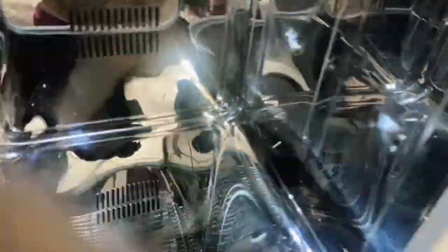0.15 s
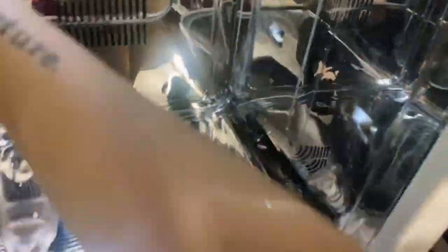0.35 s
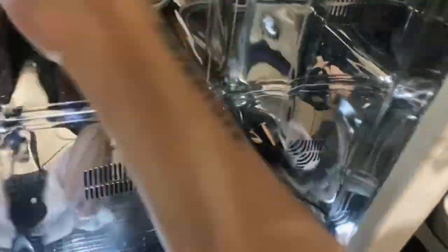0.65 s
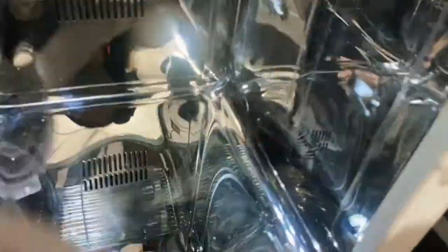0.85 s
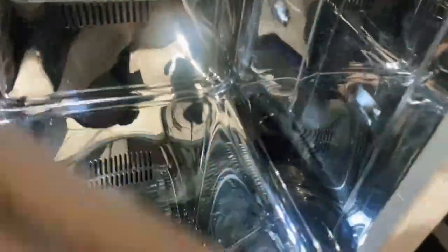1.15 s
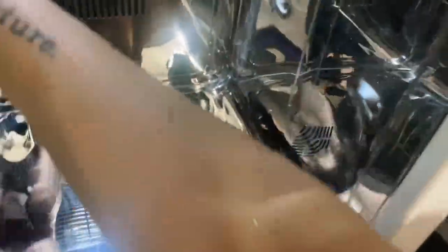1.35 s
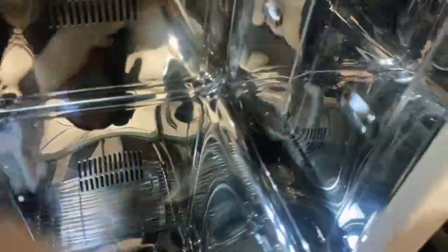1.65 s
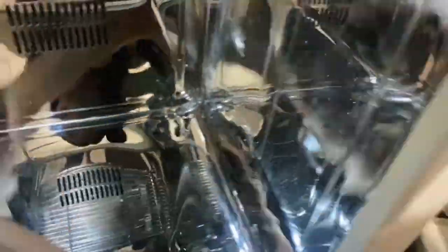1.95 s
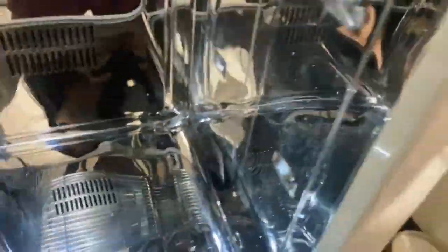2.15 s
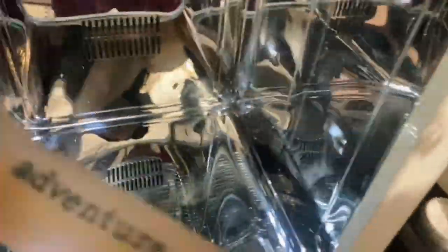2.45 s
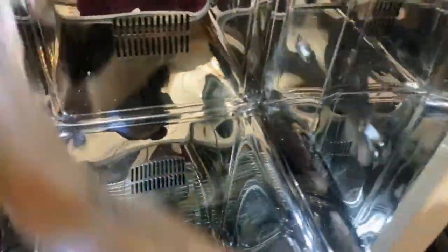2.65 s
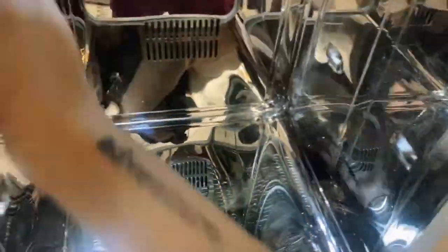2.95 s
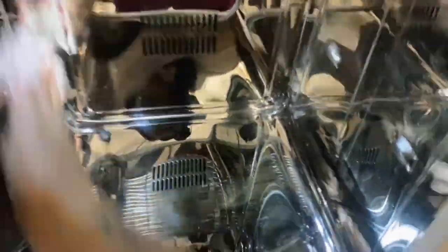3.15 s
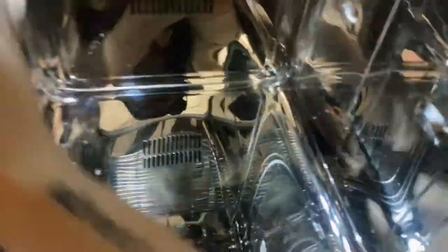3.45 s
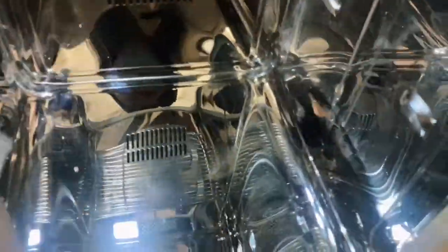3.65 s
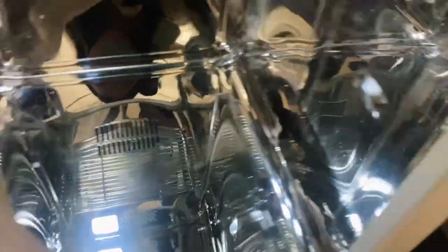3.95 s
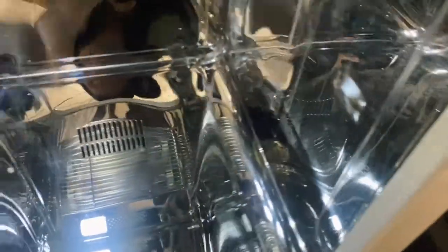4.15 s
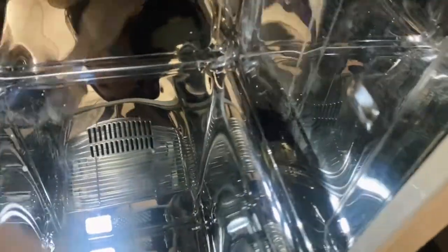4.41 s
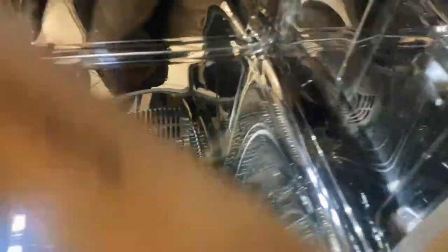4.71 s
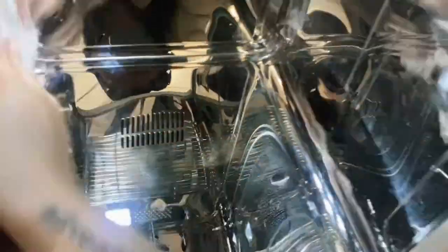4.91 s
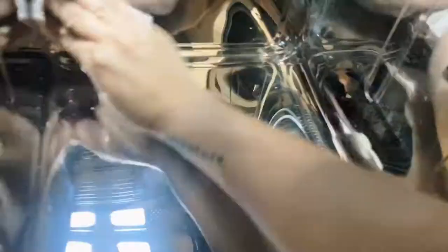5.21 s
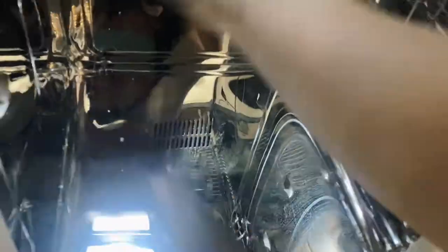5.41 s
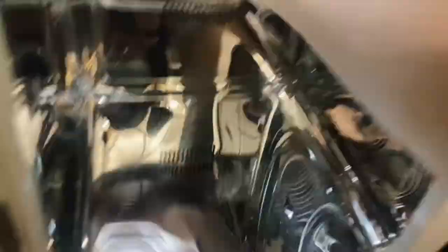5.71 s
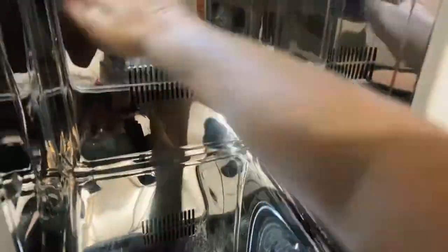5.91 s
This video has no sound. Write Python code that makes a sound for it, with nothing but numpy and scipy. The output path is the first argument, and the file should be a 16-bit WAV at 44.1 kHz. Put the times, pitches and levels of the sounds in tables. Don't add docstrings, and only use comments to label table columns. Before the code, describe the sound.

Inside a small metal cabinet, with the microphone very close, a dry cloth rubs in short uneven strokes. From 0 to 1.9 s the rubbing is busiest: low grainy scuffs, soft fibre hiss, dull plucks of sheet metal and bright little ticks, with sharper taps near 0.35, 0.75 and 1.8 s. From 2 to 4 s the rubbing thins and deeper, rounded panel thumps stand out, strongest near 2.0, 2.6 and 3.45 s. At 4.05 s a hard, short knock cracks and overloads the microphone, followed by a low door wobble fading over half a second. Light sweeps and thumps continue. At 5.15 s a softer, low ringing knock comes, then at 5.25 s a clattering rebound with loose rattle and scrape. A few scuffs and taps fade into quiet room noise by 6 s. Short, boxy metallic echo throughout.

```python
import sys
import numpy as np
from scipy import signal
from scipy.fft import rfft, irfft, next_fast_len
from scipy.io import wavfile
from scipy.ndimage import uniform_filter1d

SR = 44100
rng = np.random.default_rng(int(sys.argv[2]) if len(sys.argv) > 2 else 0)


def undo_db(level):
    steps = np.asarray(level, float) / 20
    return 10 ** steps


def file_out(sig):
    cols = np.atleast_2d(sig).T
    lim = np.clip(cols, -1, 1)
    pcm = np.round(lim * 32767).astype(np.int16)
    wavfile.write(sys.argv[1], SR, pcm)


N = 267755


def evened(x):
    return x / np.sqrt(np.mean(x ** 2) + 1e-20)


def read(points, hz):
    f, value = np.transpose(points)
    return np.interp(np.log(hz + 1), np.log(f + 1), value)


def curve(rows):
    s, value = np.transpose(rows)
    return np.interp(np.arange(N) / SR, s, value)


def add(mix, s, sound):
    part = mix[round(s * SR):][:len(sound)]
    part += sound[:len(part)]


def coloured(x, points):
    size = next_fast_len(len(x))
    gain = undo_db(read(points, np.fft.rfftfreq(size, 1 / SR)))
    return evened(irfft(rfft(x, size) * gain, size)[:len(x)])


def band(x, lo_hz, hi_hz):
    return signal.sosfilt(signal.butter(2, [lo_hz, hi_hz], "bandpass", fs=SR, output="sos"), x)


def lumps(width_s):
    size = round(width_s * SR)
    return evened(uniform_filter1d(uniform_filter1d(rng.standard_normal(N), size), size))


def struck(hz, db, t60, rise):
    t = np.arange(SR // 2) / SR
    return undo_db(db - 60 * t / t60) * (1 - np.exp(-t / rise)) * np.sin(2 * np.pi * hz * t)


# f/Hz, width/Hz, level/dB
SHELL = [(180, 33, -14), (307, 81, -7), (480, 55, -13.5), (770, 22, -5), (976, 12, -4), (1365, 73, -10),
         (2020, 250, -6.5), (2890, 84, -6.5), (3870, 270, -15.5)]


def shell(x):
    out = x.copy()
    for hz, width_hz, db in SHELL:
        out += undo_db(db + 8) * signal.lfilter(*signal.iirpeak(hz, hz / width_hz, SR), x)
    return out


# t/s, level/dB
PRESSURE = [(0.0, -37.5), (0.14, -49), (0.36, -45.5), (0.69, -49), (0.9, -44), (1.5, -47.5), (1.85, -51),
            (1.99, -54.5), (2.38, -57.5), (2.94, -59), (3.22, -49), (3.62, -54.5), (4.03, -56), (4.95, -52),
            (5.2, -78), (5.32, -42), (5.58, -51), (6.07, -65.5)]
# f/Hz, level/dB
RUB_COLOUR = [(29, -30), (60, -1), (182, 1.5), (467, -12), (567, -16), (742, -19.5), (1180, -37.5),
              (1370, -23.5), (1700, -47.5), (3820, -44.5), (5000, -83), (6500, -60), (11000, -120)]


def rub():
    grabs, t = np.zeros(N), np.arange(SR // 5) / SR
    for s, db, _ in TAPS:
        add(grabs, s, undo_db(0.24 * (db + 36)) * np.exp(-t / 0.045))
    for s, db, _ in FLOOR_THUMPS + SIDE_THUMPS:
        add(grabs, s, 0.83 * undo_db(0.56 * (db + 27)) * np.exp(-t / 0.05))
    for s, db, _ in SNAPS:
        add(grabs, s, 0.5 * undo_db(0.4 * (db + 32)) * np.exp(-t / 0.022))
    sizes = undo_db(3.7 * np.minimum(rng.exponential(1, N), 3.6))
    happens = rng.random(N) < 1500 / SR
    slips = sizes * happens * rng.choice([-1., 1.], N)
    slips = evened(slips * undo_db(1.97 * lumps(0.02) + 6.8 * np.minimum(grabs, 1.9)))
    return undo_db(curve(PRESSURE) + 5.5) * coloured(shell(slips), RUB_COLOUR)


# t/s, hiss gained level/dB
STROKES = [(0.18, 0), (0.5, 5), (1.14, 8), (2.37, 9), (2.6, 5), (2.7, 4), (2.85, 7), (3.22, 9), (3.63, 6.5),
           (4.21, 2), (4.33, 7), (5.9, 4)]
# f/Hz, level/dB
HISS_COLOUR = [(1200, -26), (2200, 0), (4200, -13.5), (5200, -13), (7500, -12.5), (10500, -10),
               (13500, -35), (15700, -23)]
HISS_DB, HISS_FOLLOWS = -80, 0.092
USUAL_PRESSURE_DB, STROKE_S = -52, 0.04


def hiss():
    hiss_db = HISS_DB + HISS_FOLLOWS * (curve(PRESSURE) - USUAL_PRESSURE_DB)
    t = np.arange(N) / SR
    for s, db in STROKES:
        hiss_db += db * np.exp(-((t - s) / STROKE_S) ** 2)
    fibres = rng.standard_normal(N) * undo_db(3.2 * lumps(0.0061) + 1.8 * lumps(0.00068))
    return undo_db(hiss_db + 2.5) * coloured(fibres, HISS_COLOUR)


# t/s, peak level/dB, f/Hz
SNAPS = [(0.055, -34, 310), (0.244, -37, 304), (0.299, -41, 237), (0.351, -27, 420), (0.406, -32, 237),
         (0.429, -30, 272), (0.492, -39, 258), (0.633, -35, 250), (0.687, -38, 320), (0.759, -28, 374),
         (0.794, -32, 288), (0.853, -29, 293), (0.894, -34, 272), (0.934, -33, 242), (0.974, -35, 256),
         (1.017, -32, 318), (1.058, -34, 269), (1.111, -32, 277), (1.149, -32, 299), (1.191, -36, 237),
         (1.244, -39, 283), (1.316, -33, 323), (1.384, -35, 328), (1.417, -33, 328), (1.473, -32, 248),
         (1.509, -42, 277), (1.591, -37, 264), (1.621, -32, 283), (1.771, -28, 237), (1.792, -22, 455),
         (1.811, -32, 452), (1.871, -34, 404), (1.974, -40, 237), (2.023, -38, 237), (2.141, -40, 293),
         (2.573, -37, 237), (2.694, -38, 248), (2.81, -40, 237), (2.974, -34, 320), (3.179, -36, 248),
         (3.226, -34, 299), (3.323, -36, 253), (3.367, -33, 299), (3.454, -37, 237), (3.612, -38, 385),
         (3.796, -36, 237), (3.902, -37, 237), (4.105, -29, 237), (4.641, -41, 237), (5.309, -33, 509),
         (5.359, -28, 256), (5.418, -32, 256), (5.449, -37, 253), (5.486, -36, 253), (5.531, -30, 272),
         (5.836, -40, 261), (5.888, -38, 237)]
# t/s, peak level/dB, f/Hz
PICKS = [(0.302, -43, 643), (0.35, -38, 550), (0.634, -46, 595), (0.756, -31.5, 552), (0.895, -42, 821),
         (0.921, -37, 770), (1.018, -40, 552), (1.06, -44, 606), (1.111, -44, 587), (1.279, -37, 767),
         (1.473, -41, 705), (1.591, -45, 568), (1.624, -42, 608), (1.771, -37.5, 678), (1.792, -32, 552),
         (1.88, -45, 598), (2.136, -47, 552), (2.567, -46, 552), (2.81, -43, 554), (3.09, -44, 608),
         (3.181, -41, 603), (3.251, -43, 654), (3.323, -50, 678), (3.365, -43, 550), (3.611, -45, 770),
         (3.801, -32, 770), (4.129, -39, 861), (4.198, -46, 552), (4.297, -50, 555), (4.344, -49, 611),
         (4.497, -46, 552), (5.36, -39, 643), (5.418, -40, 627), (5.447, -46, 552), (5.487, -47, 579),
         (5.533, -38, 649), (5.895, -43, 606)]
SNAP_T60_S, SNAP_RISE_S, PICK_T60_S, PICK_RISE_S = 0.034, 0.0011, 0.03, 0.00047


def snaps():
    out = np.zeros(N)
    for s, db, hz in SNAPS:
        add(out, s - .001, struck(hz, db - 3.5, SNAP_T60_S, SNAP_RISE_S)[:SR // 8])
    for s, db, hz in PICKS:
        pick = struck(hz, db + 0.6, PICK_T60_S, PICK_RISE_S)
        pick += struck(1387, db - 12, 0.03, PICK_RISE_S)
        add(out, s - .0005, pick[:SR // 8])
    return out


TICK_TRIM_DB = (0, 1.5, -1)
GRIT_DB = -4


def scuff(db, body_db, treble_db, rise, t60):
    t = np.arange(round(.25 * SR)) / SR
    fade = undo_db(-60 * t / t60) + 0.28 * undo_db(-60 * t / 0.0026)
    burst = rng.standard_normal(len(t)) * fade * (1 - np.exp(-t / rise))
    middle, body, treble = undo_db(np.add((db, db + body_db, treble_db), TICK_TRIM_DB))
    out = middle * band(burst, 835, 3760)
    out += body * band(burst, 480, 1417)
    out += undo_db(GRIT_DB) * body * band(burst, 250, 600)
    return out + treble * band(burst, 2500, 11600)


# t/s, peak level/dB, sharpness (treble against peak) level/dB, t60/s
TICKS = [(0.199, -58, 0.5, 0.07), (0.2563, -48, -7.5, 0.044), (0.3015, -52.5, -18, 0.14),
         (0.3503, -38, -18, 0.063), (0.42, -50, -8, 0.14), (0.4562, -49, -14, 0.1), (0.634, -53, -8, 0.28),
         (0.7565, -43.5, -10.5, 0.12), (0.7939, -53, -27, 0.1), (0.8954, -47.5, -9, 0.17),
         (0.9172, -35, -12, 0.12), (1.0173, -47, -10.5, 0.078), (1.11, -56, -12, 0.35),
         (1.2772, -44.5, -13.5, 0.22), (1.4725, -56, -21, 0.12), (1.6286, -49, -13, 0.13),
         (1.7912, -29.5, -14.5, 0.083), (2.149, -51.5, -13, 0.14), (2.5678, -64, -7, 0.17),
         (3.18, -43, -15, 0.075), (3.23, -50, -12, 0.097), (3.6106, -55.5, -9, 0.16),
         (3.8006, -42.5, -16.5, 0.1), (4.13, -45, -14.5, 0.13), (4.196, -51.5, -7, 0.082),
         (4.2992, -51, -7, 0.058), (4.4998, -47.5, -8.5, 0.045), (5.4174, -53, -26, 0.13),
         (5.5342, -47, -13, 0.12), (5.8364, -52, -13, 0.17)]
# t/s, peak level/dB
FAINT_TICKS = [(0.8694, -56), (1.0625, -56), (1.4183, -52), (1.8802, -55), (2.0214, -50), (3.2803, -56),
               (3.3234, -71), (3.3655, -66), (4.929, -58), (4.965, -56), (5.4864, -57), (5.509, -50)]
FAINT_SHARP_DB, FAINT_T60_S, TICK_RISE_S = -12.5, 0.083, 0.0012
BODY_DB, BODY_PER_DULL_DB, BODY_PER_SOFT_DB = 14, 0.27, 0.47


def ticks():
    out = np.zeros(N)
    faint = [(s, db, FAINT_SHARP_DB, FAINT_T60_S) for s, db in FAINT_TICKS]
    for s, db, sharp_db, t60 in TICKS + faint:
        body_db = BODY_DB - BODY_PER_DULL_DB * (sharp_db + 18.5) - BODY_PER_SOFT_DB * (db + 55)
        add(out, s - .001, scuff(db, body_db, db + sharp_db, TICK_RISE_S, t60))
    return out


# t/s, treble level/dB
SWISHES = [(1.865, -59), (2.105, -57), (4.455, -55), (4.659, -57), (4.9, -55.5)]
SWISH_DB, SWISH_RISE_S, SWISH_T60_S = -63, 0.028, 0.24


def swishes():
    out = np.zeros(N)
    for s, treble_db in SWISHES:
        add(out, s - .001, scuff(SWISH_DB, 0, treble_db, SWISH_RISE_S, SWISH_T60_S))
    return out


# t/s, level/dB
LEAN = [(0.0, -27), (1.25, -30), (1.76, -29.5), (2.18, -29), (2.28, -28.5), (3.11, -28), (3.58, -28.5),
        (3.79, -31.5), (4.19, -31), (4.58, -30), (4.89, -31), (5.51, -27), (5.75, -24), (6.07, -32.5)]
# f/Hz, level/dB
FLEX_COLOUR = [(1, -20), (3, 0), (17, 0), (21, -4), (26, -14), (33, -18), (42, -18), (60, -29), (80, -39),
               (120, -60), (250, -130)]
FLEX_UNEVEN_DB, FLEX_SURGE_S = 2, 0.24


def flexing():
    level_db = curve(LEAN) + 4 + FLEX_UNEVEN_DB * lumps(FLEX_SURGE_S)
    return undo_db(level_db) * coloured(rng.standard_normal(N), FLEX_COLOUR)


# t/s, peak level/dB, f/Hz
FLOOR_THUMPS = [(0.629, -35.5, 102.5), (0.851, -27.5, 132), (1.128, -50, 128), (1.393, -30, 128),
                (1.671, -33, 136), (1.975, -26, 134.4), (2.022, -14.5, 145), (2.15, -32, 158),
                (2.44, -36.5, 139), (2.475, -32.5, 144.6), (2.704, -21.5, 132), (2.749, -28.5, 139),
                (3.033, -26, 153), (3.191, -21, 156.4), (3.234, -23.5, 139), (3.327, -26, 170),
                (3.461, -12, 140), (3.49, -19, 133.7), (3.607, -27, 122.2), (3.905, -17, 134),
                (4.373, -44, 123), (4.51, -24, 123), (4.548, -36, 141.4), (4.67, -35, 127.4),
                (5.354, -40, 119), (5.409, -29, 105), (5.524, -22.5, 101), (5.562, -46, 126)]
# t/s, peak level/dB, f/Hz
SIDE_THUMPS = [(0.059, -28.5, 176), (0.243, -28.5, 198.4), (0.409, -19.5, 170.5), (0.429, -33, 264.6),
               (0.758, -28.5, 180), (0.966, -27.5, 178), (1.053, -60, 272), (1.112, -28, 196),
               (1.15, -52, 295), (1.369, -25, 180), (1.557, -40, 195), (1.616, -32, 196), (1.787, -22, 182),
               (1.866, -27.5, 172), (2.568, -17, 167.5), (2.68, -24, 179), (2.812, -20.5, 181),
               (2.93, -30.5, 161), (2.981, -18.5, 158), (3.08, -28.5, 169), (3.357, -24, 175),
               (3.798, -23.5, 182), (4.634, -23, 168), (4.868, -37.5, 182)]
THUMP_T60_S, THUMP_LONGER_PER_DB = 0.12, 0.0757


def thumps():
    out = np.zeros(N)
    for s, db, hz in FLOOR_THUMPS + SIDE_THUMPS:
        t60 = THUMP_T60_S * np.exp(-THUMP_LONGER_PER_DB * (db + 28))
        upper_hz = rng.uniform(1.7, 2.05) * hz
        add(out, s - .003, -struck(hz, db + 1.5, t60, 0.0058) - struck(upper_hz, db - 10.5, 1.29 * t60, 0.02))
        add(out, s, -struck(256, db - 8, 0.0061, 0.00062))
    return out


# t/s, peak level/dB, f/Hz
TAPS = [(0.325, -51, 347), (0.352, -24.5, 450), (0.419, -35, 452), (0.755, -21.5, 368), (0.853, -37, 340),
        (1.017, -34.5, 338), (1.059, -49, 340), (1.11, -43.5, 365), (1.282, -33, 737), (1.343, -39, 440),
        (1.418, -36, 426), (1.473, -33, 336), (1.62, -28, 321), (1.792, -18, 443), (2.57, -39, 386),
        (2.696, -38, 444), (2.982, -33.5, 365), (3.048, -38, 374), (3.23, -52, 386), (3.279, -39.5, 396),
        (3.368, -50, 382), (3.611, -35, 393), (3.801, -32, 753), (4.298, -38, 453), (4.532, -34, 350),
        (5.282, -26.5, 481), (5.361, -34.5, 350), (5.535, -30, 366), (5.838, -37.5, 314),
        (5.89, -33.5, 461)]
TAP_T60_S = 0.081


def taps():
    out = np.zeros(N)
    for s, db, hz in TAPS:
        tap = struck(hz, db - 4, TAP_T60_S, 0.00051)
        for ratio in rng.uniform((1.13, 1.35), (1.3, 1.8)):
            tap += struck(ratio * hz, db - 14.5, 1.35 * TAP_T60_S, 0.0032)
        add(out, s - .001, tap)
    return out


# (f/Hz, level/dB, t60/s)
KNOCKS = [
    (4.051, 7, [(119, -6, 0.033), (170.8, -2, 0.042), (315, -6.5, 0.024), (440, -14, 0.035), (538.4, -4, 0.016), (770, -24, 0.04), (877, -44, 0.2), (1256, -26, 0.027), (2110, -38, 0.027), (3700, -58, 0.04)]),
    (5.152, -3.5, [(140, -9, 0.12), (164.4, 3, 0.045), (196, -9, 0.2), (250, -17, 0.2), (289, -19, 0.2), (380, -15, 0.11), (452, -20, 0.22), (523, -25.5, 0.13), (727, -20.5, 0.055)]),
    (5.241, -12.5, [(77.6, 2, 0.06), (124, 4.5, 0.086), (299, -9, 0.16), (480, -10, 0.084), (850, -2, 0.011), (1350, -13, 0.026), (1985, -17, 0.02)]),
    (4.057, -1, [(525, 1, .036), (390, -4, .03), (310, -6, .035)]),
    (5.1585, -8, [(158, 0, .05), (440, -12, .05)]),
]
# t/s, f/Hz, level/dB, t60/s
PING = (4.052, 4571, -51.5, .36)


def knocks():
    out = np.zeros(N)
    for (s, level_db, modes), rise in zip(KNOCKS, (.0003, .012, .002, .0005, .002)):
        for hz, db, t60 in modes:
            add(out, s, -struck(hz, level_db + db, t60, rise))
    add(out, PING[0], struck(*PING[1:], 0.005))
    return out


# t/s, peak level/dB, body against peak level/dB, treble against peak level/dB, t60/s
CRACKS = [
    (4.0516, -22.5, 9, -27.5, 0.044),
    (5.1452, -52, 18, -17, 0.11),
    (5.238, -29.5, 9.5, -14.5, 0.07),
    (5.255, -30.5, 9.5, -10.5, 0.058),
    (5.2691, -37, 6.5, -10, 0.19),
    (5.3608, -47.5, 17, -23, 0.037),
]
CRACK_RISE_S = 0.0017


def cracks():
    out = np.zeros(N)
    for s, db, body_db, sharp_db, t60 in CRACKS:
        add(out, s - .001, scuff(db, body_db, db + sharp_db, CRACK_RISE_S, t60))
    return out


# t/s, peak level/dB, f/Hz (negative = outward first), rise/s, t60/s
WOBBLE = [
    (4.072, -11, -12, .002, .2),
    (4.106, -8, 36, .002, .2),
    (4.138, -9, 21.5, .02, .7),
    (4.156, -11, 43, .006, .25),
]


def wobble():
    out = np.zeros(N)
    for s, db, hz, rise, t60 in WOBBLE:
        add(out, s, -struck(hz, db, t60, rise))
    return out


# t/s, f/Hz, level/dB, t60/s
RINGS = [(.757, 880, -40, 0.11), (.757, 560, -41, .15), (4.072, 545, -17, .08), (4.074, 870, -33, 0.073),
         (4.097, 620, -34, 0.054), (4.125, 560, -38, .15), (4.15, 290, -31, .035), (3.605, 770, -45, 0.11),
         (.912, 760, -39, 0.12), (1.815, 480, -32, .1), (5.285, 1330, -46, .12), (5.345, 1450, -50, .12),
         (6, 1500, -52, .08), (5.535, 1450, -50, .1), (.92, 5300, -56, .07), (1.283, 5200, -62, .08),
         (1.283, 1000, -49.5, .15), (5.252, 780, -31, .06), (5.254, 262, -19, 0.055),
         (5.27, 210, -22, 0.063), (.925, 3500, -56, .1), (0.37, 1400, -52, 0.15), (.918, 4380, -43, 0.089),
         (1.112, 1384, -58, 0.25), (1.283, 1368, -50, 0.5), (.02, 1390, -54, .4), (5.254, 290, -20, .08),
         (5.272, 200, -19, .06), (1.283, 4500, -57, 0.13), (1.283, 6000, -64, 0.08), (1.51, 770, -49, 0.25),
         (1.795, 480, -40, 0.34), (5.29, 200, -15.5, 0.036), (3.182, 1390, -49.5, 0.24),
         (5.28, 1600, -55, 0.23)]
RING_FLUTTER, RING_FLUTTER_S = 0.8, 0.006


def rings():
    out = np.zeros(N)
    flutter = 1 + RING_FLUTTER * lumps(RING_FLUTTER_S)
    for s, hz, db, t60 in RINGS:
        buzz = np.roll(flutter, -round(s * SR))[:SR // 2]
        add(out, s, struck(hz, db, t60, 0.0048) * buzz)
    return out


RATTLE_DB = (-42, -28, -8, -40, -30)
RATTLE_T60_S = (0.19, 0.19, 0.21, .1, .1)
RATTLE_PER_S = 1200


def rattle():
    out, t = np.zeros(N), np.arange(round(.3 * SR)) / SR
    for (s, level_db, _), db, t60 in zip(KNOCKS, RATTLE_DB, RATTLE_T60_S):
        grains = rng.standard_normal(len(t)) * (rng.random(len(t)) < RATTLE_PER_S / SR)
        chatter = evened(band(band(grains, 150, 554), 120, 710))
        add(out, s, undo_db(level_db + db - 60 * t / t60) * (1 - np.exp(-t / 0.004)) * chatter)
    return out


# f/Hz, t60/s
ECHO = [(100, 0.29), (500, 0.12), (2000, 0.14), (8000, 0.11)]


def echo(x):
    reflections = np.zeros(SR // 2)
    at = np.arange(100, len(reflections) - 20, 20)
    reflections[at + rng.integers(0, 20, len(at))] = rng.choice([-1., 1.], len(at))
    hz, t, z = signal.stft(reflections, SR, nperseg=256)
    tail = signal.istft(z * undo_db(-60 * t / read(ECHO, hz)[:, None]), SR, nperseg=256)[1]
    return signal.oaconvolve(x, tail / np.linalg.norm(tail))[:N]


# f/Hz, level/dB
ROOM_COLOUR = [(35, -27), (60, -3), (91, -9), (171, -16), (231, -29.5), (395, -24), (480, -17.5),
               (780, -32), (2060, -34), (2670, -38.5), (4600, -41.5), (5100, -51.5), (11000, -54),
               (15700, -55)]
ROOM_DB = -53


def room():
    air = rng.standard_normal(N) * undo_db(1.1 * lumps(0.099) + 1.2 * lumps(0.012))
    return undo_db(ROOM_DB + 3.5) * coloured(air, ROOM_COLOUR)


def scene():
    cloth = rub() + hiss()
    walls = flexing() + thumps() + taps() + wobble()
    hits = shell(ticks() + swishes() + cracks()) + snaps() + knocks() + rings() + rattle()
    return (cloth + walls + hits + undo_db(-18) * echo(hits) + room())[None]


def roll_off(x):
    return signal.sosfilt(signal.butter(12, 15720, fs=SR, output="sos"), x)


def record(dry):
    ceiling, knee, cut_hz = 0.72, 8, 15720
    bent = dry / (1 + abs(dry / ceiling) ** knee) ** (1 / knee)
    mix = irfft(rfft(bent) * (np.fft.rfftfreq(N, 1 / SR) < cut_hz), N)
    return roll_off(mix)


dry = scene()
out = record(dry)
file_out(out)
```